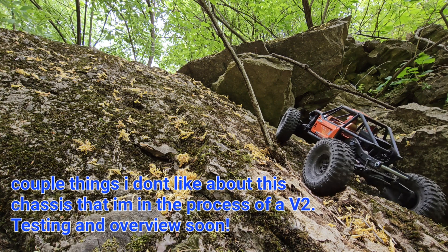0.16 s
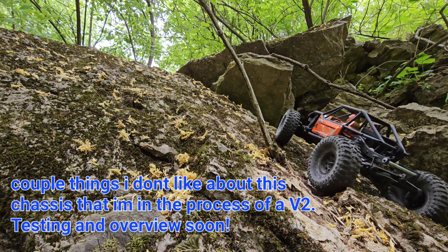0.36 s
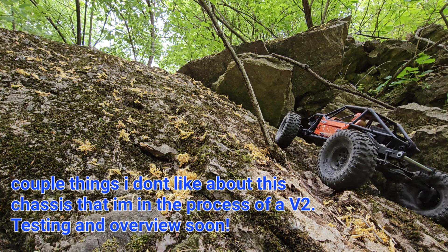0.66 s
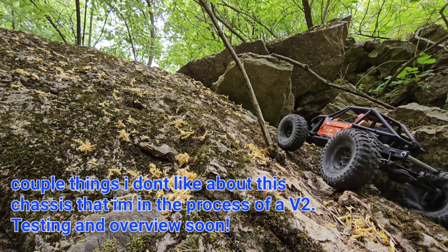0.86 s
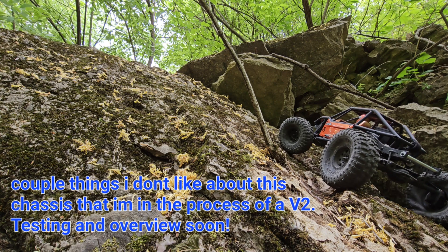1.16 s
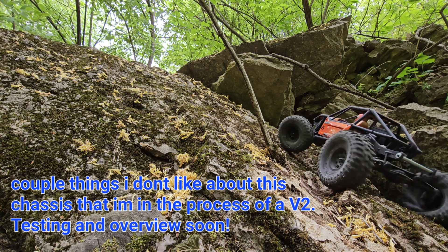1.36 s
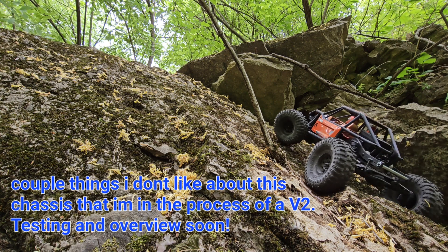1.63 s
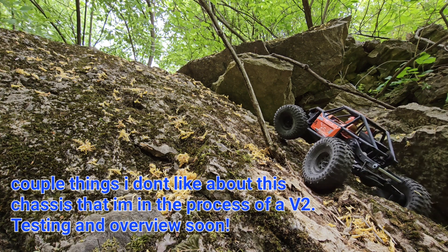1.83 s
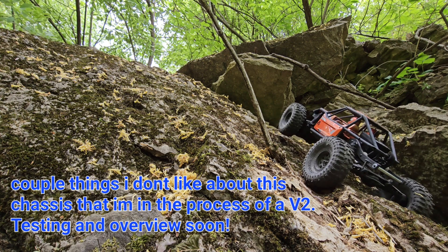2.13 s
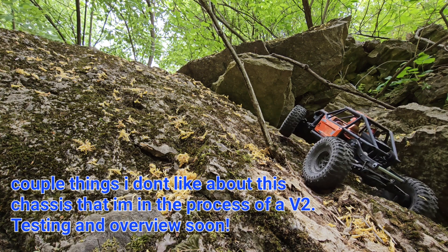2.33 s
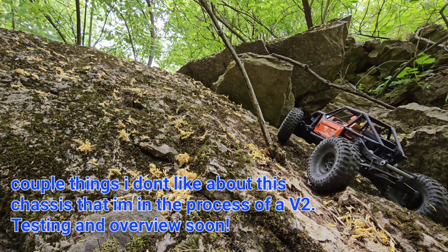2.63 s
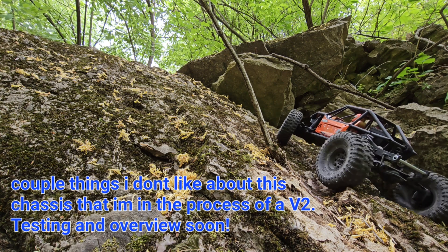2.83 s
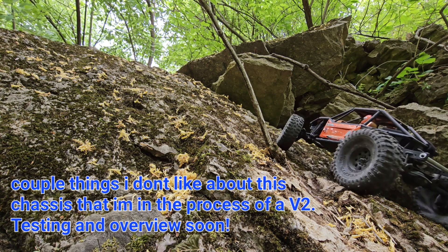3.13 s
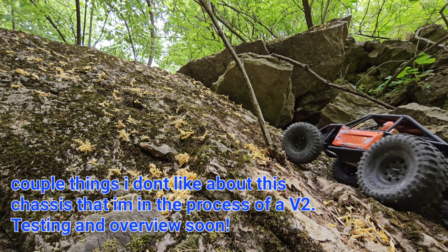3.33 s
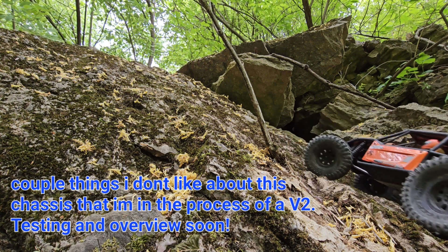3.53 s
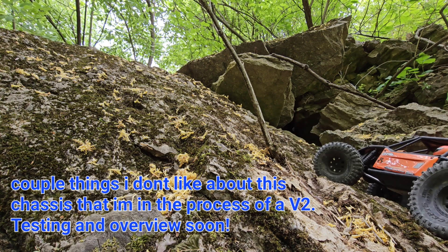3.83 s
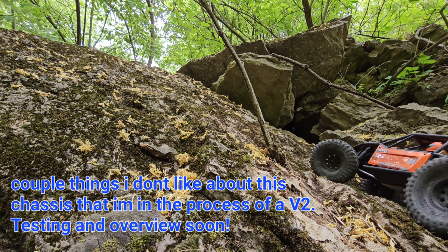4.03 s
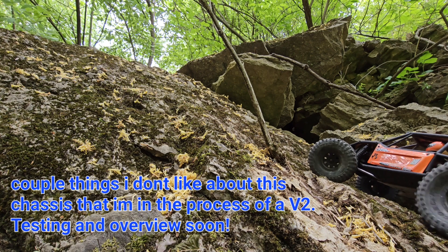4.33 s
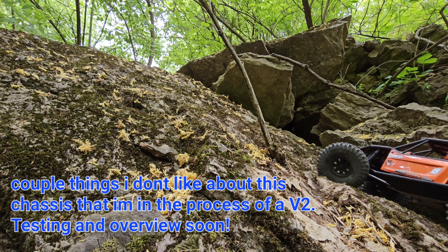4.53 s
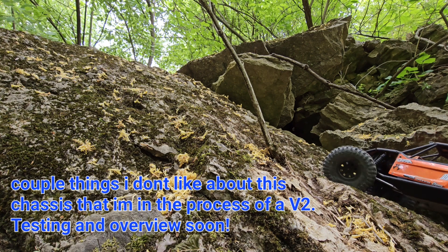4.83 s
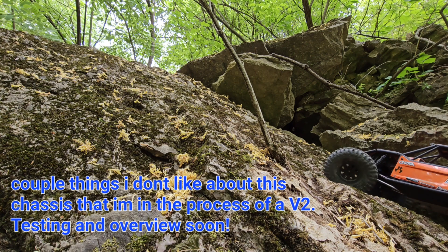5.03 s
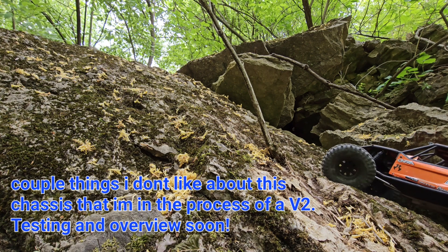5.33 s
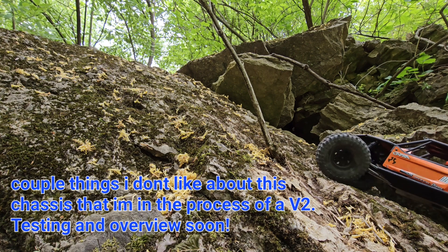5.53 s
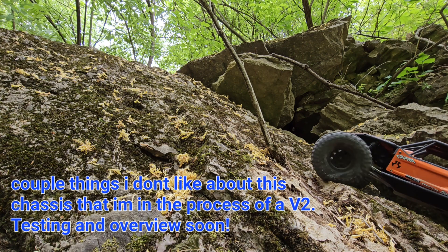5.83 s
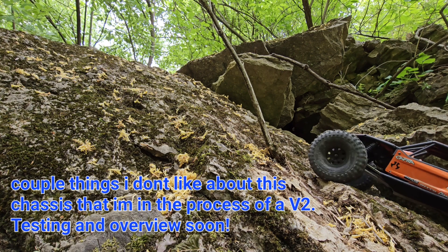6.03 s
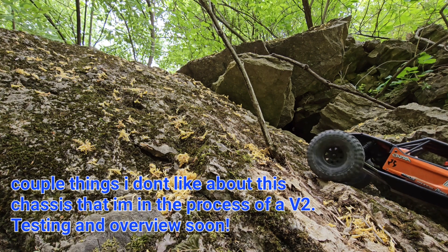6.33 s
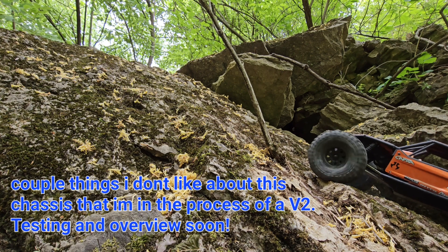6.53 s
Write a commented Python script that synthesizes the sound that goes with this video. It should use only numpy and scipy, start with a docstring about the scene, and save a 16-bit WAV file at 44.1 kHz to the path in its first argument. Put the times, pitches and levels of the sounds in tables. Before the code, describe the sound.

A small radio-controlled truck scrabbles up a rock slope, servo whining briefly, rubber tyres scraping and thumping, dry leaves crackling, growing close and loud.

```python
"""On a rock slope in the woods, a small radio-controlled truck crawls up and comes close.
Its rubber lugs slip and thump, made from random tiny impulses; grit and dry leaves crunch and snap as noise.
Knocks ring a few damped chassis tones, and the steering servo whines in short moves as its gear teeth mesh.
Behind it lie filtered noise for the hush of the trees and a low rumble, and a drifting tone for a far engine."""
import sys
import numpy as np
from scipy import signal
from scipy.fft import rfft, irfft
from scipy.io import wavfile
from scipy.ndimage import map_coordinates

SR = 44100
rng = np.random.default_rng(int(sys.argv[2]) if len(sys.argv) > 2 else 0)


def int16_out(signal):
    """Quantize to a 16-bit WAV file."""
    q = np.round(np.clip(np.atleast_2d(signal).T, -1, 1) * 32767)
    wavfile.write(sys.argv[1], SR, q.astype(np.int16))


N = 294058
T = np.arange(N) / SR  # time in seconds


def amp(db):
    """Turn decibels into a plain multiplier."""
    return 10 ** (np.asarray(db) / 20)


def unit(x):
    """Scale a sound to an average (RMS) level of one."""
    return x / np.sqrt(np.mean(x ** 2) + 1e-20)


def curves(rows):
    """The columns of a table of (seconds, values), joined by straight lines."""
    seconds, *columns = np.transpose(rows)
    return [np.interp(T, seconds, column) for column in columns]


def colour(x, points):
    """Filter with the given spectrum, never sounding before its input (minimum phase)."""
    hz, db = np.transpose(points)
    bins_hz = abs(np.fft.fftfreq(8192, 1 / SR))
    bins_db = np.interp(np.log(bins_hz + 1), np.log(hz), db)
    log_gain = np.log(amp(bins_db))
    taps = np.fft.ifft(np.exp(np.conj(signal.hilbert(log_gain)))).real[:4096]
    return signal.oaconvolve(x, taps)[:len(x)]


def drift(hz):
    """Slow random wander of unit size, mostly below the given rate."""
    f = np.fft.rfftfreq(N, 1 / SR)
    return unit(irfft(rfft(rng.standard_normal(N)) / (1 + (f / hz) ** 4), N))


def steady(x, seconds):
    """Even out the level over the given time, leaving faster flutter alone."""
    window = signal.windows.hann(int(seconds * SR))
    power = abs(signal.oaconvolve(x ** 2, window / window.sum(), "same"))
    return x / np.sqrt(power + 1e-12)


def add(mix, start, sound):
    """Lay a sound into the mix at a start time in seconds."""
    part = mix[max(round(start * SR), 0):][:len(sound)]
    part += sound[:len(part)]


def swell(start, length, attack_s, release_s):
    """Soft attack, hold and release."""
    attack = 0.5 + 0.5 * np.tanh(2 * (T - start) / attack_s - 1)
    return attack * np.exp(-np.maximum(T - start - length, 0) / release_s)


def air(points):
    """Steady noise of unit level with the given spectrum."""
    return unit(colour(rng.standard_normal(N), points))


def background():
    """Low rumble and a far engine, nearly alike in both ports, under the hush of the trees."""
    # Far engine. Each row: time in seconds, pitch in Hz, level in dB before a 1 dB lift
    engine = [(0, 91.7, -63), (.25, 91.4, -52), (.72, 94, -63), (2.0, 96.7, -61), (2.5, 99, -57),
              (3.15, 102, -54.5), (3.6, 102.7, -61), (4.3, 102.6, -75), (6.6, 102, -65)]
    # Spectra of the rumble and the trees. Each row: frequency in Hz, strength in dB
    rumble_colour = [(10, -17), (25, -3), (45, 0.5), (80, 1.5), (110, -8), (170, -22), (300, -29),
                     (800, -70.5)]
    woods_colour = [(20, -12), (120, 3), (220, 1.5), (350, -4.5), (650, -10.5), (1250, -12), (1800, -16),
                    (2800, -18.5), (5000, -18), (9000, -30), (12000, -41.5), (16000, -9.5)]
    # Level of the low rumble. Each row: time in seconds, level in dB
    rumble_level = [(0, -55.5), (.78, -56), (.9, -60.5), (2.0, -56.5), (3.3, -56.5), (4.1, -54), (5.6, -60),
                    (6.66, -55.5)]
    # The rumble surges briefly. Each row: start in seconds, length in seconds, level in dB
    surge_rows = [(2.207, 0.14, -50), (5.84, 0.098, -55)]
    surge_edge_s = 0.03

    engine_hz, engine_db = curves(engine)
    hum_gain = amp(engine_db + 1.0 + 0.54 * drift(hz=11.0))
    hum_turns = np.cumsum(engine_hz + 0.92 * drift(hz=7.5)) / SR
    hum = hum_gain * np.sin(2 * np.pi * hum_turns)

    surges = sum(amp(db) * swell(start, length, surge_edge_s, surge_edge_s)
                 for start, length, db in surge_rows)
    rumble_gain = np.hypot(amp(curves(rumble_level)[0]), surges)
    rumble = rumble_gain * steady(air(rumble_colour), seconds=0.39)
    shared = hum + rumble + amp(-72) * air(woods_colour)

    def port():
        """The shared sound plus a little rumble and hush of this port's own."""
        return shared + 0.21 * rumble_gain * air(rumble_colour) + amp(-70.5) * air(woods_colour)
    return np.array([port() for _ in range(2)])


def ring(hz, width_hz):
    """An unsteady resonance: a tone whose strength and phase wander."""
    cosine = drift(width_hz) * np.cos(2 * np.pi * hz * T)
    return cosine + drift(width_hz) * np.sin(2 * np.pi * hz * T)


def strain():
    """Unsteady resonances of the loaded gearbox and of the servo holding against a load."""
    # The drive labours and the servo holds. Each row: start in seconds, length in seconds,
    # gear whirr in dB, servo whistle in dB (both set before the 4 dB cut below)
    loads = [(0.094, 0.44, -76, -84.5), (0.754, 0.33, -96, -76), (1.108, 0.27, -88, -87),
             (1.435, 0.14, -61, -66), (2.67, 0.32, -74, -86), (3.096, .07, -82, -82)]
    attack_s, release_s = 0.037, 0.027
    gear_gain, hold_gain = sum(
        np.outer(amp([gear_db, hold_db]), swell(start, length, attack_s, release_s))
        for start, length, gear_db, hold_db in loads)
    gear = gear_gain * ring(hz=3000, width_hz=340)
    hold = hold_gain * ring(hz=7280, width_hz=300)
    return amp(-4.0) * (gear + hold)


def steering():
    """For each move, the mesh rate and gain: the motor spins up, sags under the load and brakes."""
    # Each row: start in seconds, powered time in seconds, free gear mesh rate in Hz, share of speed
    # lost to the load per second, level in dB, extra level of the odd multiples in dB
    moves = [(.799, 0.053, 2394, .3, -50.5, 4), (.906, .162, 2220, 2.5, -51.5, -1.5),
             (2.023, 0.086, 2542, 0.35, -49.5, -9), (2.118, 0.053, 2272, 0.32, -49, -4),
             (2.234, 0.11, 1220, 1, -58, -3), (2.336, 0.068, 1836, .6, -53, -5.5),
             (3.305, 0.063, 1197, 0.11, -54.5, -14), (3.348, 0.035, 1940, .1, -50.5, -3),
             (3.362, .096, 2275, 0.36, -45, -30), (5.9, 0.1, 3300, 3.5, -49, -15),
             (5.979, 0.064, 2710, 4, -46, 9)]
    spin_up_s, brake_s, release_s = 0.02, 0.048, 0.056
    speed_power = 1.55  # the whine grows as this power of the motor's speed
    ease_db_per_s = 29  # each move also fades from its start
    for start, length, free_hz, sag, db, odd_db in moves:
        t = np.arange(0, length + 0.1, 1 / SR)
        braking = np.maximum(t - length, 0)
        speed = (1 - np.exp(-t / spin_up_s)) * np.maximum(1 - sag * t, 0)
        speed *= np.exp(-(braking / brake_s) ** 2)
        gain = amp(db - ease_db_per_s * t) * speed ** speed_power * np.exp(-braking / release_s)
        yield start, free_hz * speed, gain, odd_db


def servo():
    """Gear teeth mesh at the motor's speed; uneven teeth add sidebands and a rasp."""
    # Tones of the whine. Each row: multiple of the mesh rate, level in dB
    mesh = [(1, 6), (2, -0.5), (3, 1.5), (4, -3), (5, -3.5), (6, -1.5)]
    # Colour of the servo's case. Each row: frequency in Hz, strength in dB
    case_colour = [(500, -16), (1800, -21.5), (3200, -8.5), (4700, -3), (6000, -11), (7300, -3), (9000, -7),
                   (10500, -17), (16000, -37)]
    out, wobble = np.zeros(N), 1 + 0.0059 * drift(hz=204)
    for start, hz, gain, odd_db in steering():
        turns = np.cumsum(hz * wobble[round(start * SR):][:len(hz)]) / SR
        whine = sum(amp(level + odd_db * (round(k) % 2)) * np.sin(2 * np.pi * round(k) * turns)
                    for k, level in mesh)
        shaft = turns / 9  # nine teeth on the pinion
        tooth_errors = sum(np.cos(2 * np.pi * (k * shaft + rng.random())) for k in range(1, 9))
        uneven = 1 + 0.52 * unit(tooth_errors)
        rasp = rng.standard_normal(len(hz)) * (1 + 0.67 * np.cos(2 * np.pi * turns))
        add(out, start, gain * (unit(whine) * uneven + 0.46 * rasp))
    return colour(out, case_colour)


def snaps():
    """Grit and leaf stems crack: noise crumbles up to a sharp break, then leaves a few crumbs."""
    # Each row: time in seconds, peak in dB before the 5 dB cut below
    snap_rows = [(0.1, -48.5), (0.249, -42), (0.444, -54), (0.4763, -45.5), (0.5052, -47.5), (0.5637, -42),
                 (0.576, -44.5), (1.257, -49), (1.4234, -46), (1.951, -49), (2.1413, -39.5),
                 (2.6449, -47.5), (2.9287, -44), (3.743, -37), (5.325, -35), (6.5485, -18)]
    # Spectrum of a snap. Each row: frequency in Hz, strength in dB
    snap_colour = [(300, -6), (1500, 15), (3000, 11), (5000, 4), (8000, 1.5), (10000, -6), (16000, -1)]
    out, t = np.zeros(N), np.arange(4096) / SR
    from_break = abs(t - 0.003)
    shape = np.exp(-from_break / 0.0011) + 0.1 * np.exp(-from_break / 0.004)
    for start, db in snap_rows:
        crack = colour(rng.standard_normal(len(t)) * shape, snap_colour)
        add(out, start - 0.0012, amp(db - 5.0) * crack / abs(crack).max())
    return out


def knocks():
    """A tyre lets go and knocks the chassis: damped modes ring under a short plastic clack."""
    # Each row: time in seconds, thump peak in dB before a 5.5 dB cut,
    # hardness as clack over thump in dB before a 6 dB lift
    blows = [(1.477, -33.5, -11.5), (2.532, -45, -6), (2.742, -43, -21), (3.274, -31.5, -16),
             (3.511, -26, -22), (3.639, -45, -2), (3.704, -33, -11), (3.742, -35, -8), (3.824, -45.5, -0.5),
             (3.853, -37, -6), (4.101, -35, -9), (4.15, -34.5, -11), (4.456, -32, -11), (4.835, -32, -11),
             (4.86, -20, -18), (4.897, -20.5, -13.5), (4.974, -22.5, -14), (5.001, -25, -33),
             (5.164, -28, -15), (5.42, -19.5, -14.5), (5.56, -21, -14.5), (5.771, -20.5, -15),
             (5.875, -25, -7), (6.005, -25, -27), (6.082, -29.5, -8.5), (6.594, -31, 1), (6.605, -29, -16)]
    # Chassis tones. Each row: frequency in Hz, level in dB, time to fade by 60 dB in seconds
    modes = [(260, -10, 0.044), (353, -3, 0.022), (502, 2.5, 0.026), (630, 8, 0.008), (1130, 8, 0.0062)]
    # Spectrum of the clack. Each row: frequency in Hz, strength in dB
    clack_colour = [(200, -7.5), (700, 24.5), (1400, -6), (2200, -1), (3100, 0), (5000, -18), (8000, -34),
                    (16000, -42)]
    out, t = np.zeros(N), np.arange(4096) / SR
    cushion = 1 - np.exp(-t / 0.00029)  # the rubber softens the first instant
    for start, db, hard_db in blows:
        stiffness = 1 + 0.019 * rng.standard_normal()  # each blow is tuned slightly differently
        thump = cushion * sum(amp(level - 60 * t / t60) * np.sin(2 * np.pi * hz * stiffness * t)
                              for hz, level, t60 in modes)
        clack = colour(rng.standard_normal(len(t)) * t * np.exp(-t / 0.00065), clack_colour)
        blow = thump / abs(thump).max() + amp(hard_db + 6) * clack / abs(clack).max()
        add(out, start + 0.00197, amp(db - 5.5) * blow)
    return out


def slips(per_s, spread_db):
    """Random tiny impulses: most are small, a few large."""
    size = amp(spread_db * np.minimum(rng.exponential(1, N), 4))
    return size * rng.choice([-1, 1], N) * (rng.random(N) < per_s / SR)


def paths(impulses, t60):
    """Three rows: the impulses themselves, and the dense scatter that they leave at each port."""
    decay = float(amp(-120 / (t60 * SR)))  # energy kept per sample
    energy = signal.lfilter([1 - decay], [1, -decay], impulses ** 2)
    return np.array([impulses, *(np.sqrt(energy) * rng.standard_normal((2, N)))])


def tyre_gains():
    """Strength of thumping, scraping and crackle: rolling, slides and the hiss of steering moves add in power."""
    # The tyres roll, louder as the truck nears. Each row: time in seconds, scraping level in dB
    rolling_level = [(0, -75), (.45, -75.5), (.72, -78.5), (1.0, -73), (1.35, -83), (1.7, -73), (2.05, -76),
                     (2.9, -76), (3.25, -66.5), (3.55, -62), (3.8, -67.5), (4.0, -68.5), (4.2, -58.5),
                     (5.0, -59), (6.05, -62), (6.67, -48)]
    roll_thump_db, roll_crackle_db = -1.5, -11  # against the scraping of a rolling tyre
    # The tyres break loose and slide. Each row: start in seconds, length in seconds, scraping in dB,
    # lug thumping over that in dB, leaf crackle over that in dB, swell from start to end in dB
    slides = [(0.407, 0.074, -68.5, 1.5, -18, -1), (1.425, 0.094, -55, -3.5, -11, 1),
              (1.521, 0.07, -60.5, -1, -4, -7), (1.764, .19, -67.5, 0, -11, -3.5),
              (2.51, 0.16, -73, 1.5, -12, -1), (3.304, 0.049, -62.5, 8, -10, 1),
              (3.369, .11, -59.5, 7.5, -2, 3.5), (3.488, 0.18, -57, 6.5, -6.5, 0.5),
              (3.688, .06, -56.5, -2, -8.5, -6), (3.817, 0.036, -60.5, 4, -11, -9),
              (3.906, 0.037, -62, 3.5, -5, -10), (4.089, 0.07, -49.5, 0, -16, 2.5),
              (4.221, 0.11, -55.5, 1, -25, -9), (4.332, 0.438, -54, 3, -11.5, 0),
              (4.811, 0.066, -53.5, 8, -12, -10), (4.948, 0.083, -56, 8, -15, -9),
              (5.07, 0.4, -54, 2, -11.5, 6), (5.468, 0.206, -50.5, -1, -11.5, 3.5),
              (5.635, 0.062, -46.5, 4.5, -2, 4), (5.718, 0.268, -48.5, 0.5, -10.5, 4),
              (6.063, .21, -50.5, 1, -12.5, 9), (6.291, 0.094, -44, 0, -5, 4.5),
              (6.385, 0.087, -38.5, 2, -5, 0.5), (6.479, 0.13, -40, 2, -6, 2),
              (6.62, 0.042, -50.5, 4, -2, -3)]
    attack_s, release_s = 0.017, 0.02
    # During each steering move a hiss rises and falls with the servo: thumping, scraping and crackle, in dB
    # against the servo's gain
    steer_db = [-23, -31, -16]

    balance_db = np.array([[roll_thump_db], [0], [roll_crackle_db]])
    power = amp(curves(rolling_level)[0] + balance_db) ** 2
    for start, length, db, thump_db, crackle_db, swell_db in slides:
        progress = np.clip((T - start) / length, 0, 1) - 0.5
        gain = amp(db + swell_db * progress) * swell(start, length, attack_s, release_s)
        power += np.outer(amp([thump_db, 0, crackle_db]), gain) ** 2
    for start, _, gain, _ in steering():
        for row, db in zip(power, steer_db):
            add(row, start, (amp(db) * gain) ** 2)
    return np.sqrt(power)


def tyres():
    """Lugs catch and let go; each slip thumps the tyre, scrapes the rock and crushes leaves."""
    # Spectra of the three sounds. Each row: frequency in Hz, strength in dB
    lug_colour = [(30, -32.5), (90, -11), (160, -2), (250, 1), (400, -3.5), (520, 1), (650, 0.5),
                  (830, -5.5), (1500, -17.5), (3000, -71), (8000, -82)]
    scrape_colour = [(200, -42), (700, -8.5), (980, 2.5), (1250, 6), (1550, 3), (1850, -1), (2300, -3),
                     (3000, -8), (4000, -13.5), (5500, -21), (8000, -22.5), (16000, -34.5)]
    crackle_colour = [(500, -33), (2000, -58), (3500, -5), (5000, -4), (7500, -2.5), (9800, 1),
                      (11500, 1.5), (13000, -3.5), (16000, 6)]
    grip = drift(hz=41.4)  # stick and slip, shared by all three sounds
    lugs = slips(per_s=1100, spread_db=2.0) * amp(2.0 * grip)
    scrape = slips(per_s=6000, spread_db=3.0) * amp(0.73 * grip + 1.04 * drift(hz=220))
    crackle = slips(per_s=8300, spread_db=3.5) * amp(1.205 * grip + 2.0 * drift(hz=316))
    layers = zip([lugs, scrape, crackle], [lug_colour, scrape_colour, crackle_colour], tyre_gains())
    out = np.zeros((3, N))
    for impulses, spectrum, gain in layers:
        rows = paths(steady(impulses, seconds=0.15), t60=0.022)
        sound = np.array([colour(row, spectrum) for row in rows])
        out += unit(sound) * gain
    return out


def rocks(x, t60, count=4):
    """A short scatter from the rock faces; its paths keep changing as the truck moves."""
    t = np.arange(SR // 8) / SR
    shares = np.array([drift(hz=6) for _ in range(count)])
    out = np.zeros(N)
    for share in shares / np.linalg.norm(shares, axis=0):
        echoes = rng.standard_normal(len(t)) * (rng.random(len(t)) < 5000 / SR)  # sparse echoes
        taps = echoes * (t > 0.0006) * amp(-60 * t / t60)
        out += signal.oaconvolve(x * share, taps / np.linalg.norm(taps))[:N]
    return out


def scene():
    """The truck reaches the left port first; rough ground and flat rock faces scatter it into both."""
    # The right port hears the truck later. Each row: time in seconds, delay in samples
    lag = [(0, 11.8), (3.1, 12.5), (3.5, 16.2), (5.5, 17.3), (6.67, 14.5)]
    # Balance between the ports. Each row: time in seconds, left minus right in dB
    pan = [(0, -1.5), (2.5, -1.5), (3.6, 2), (5, 1), (6.5, 1.5)]
    # Colour of the rock reflections. Each row: frequency in Hz, strength in dB
    echo_colour = [(100, -16), (500, -9.5), (1300, -5.5), (2500, 2), (6000, 7.5), (16000, 5)]
    rolling, *ground_scatter = tyres()
    body = knocks() + snaps() + servo() + strain()
    truck = rolling + body
    late = map_coordinates(truck, [np.arange(N) - curves(lag)[0]], order=3)

    faces = np.sqrt(0.45)  # 45 % of the scatter's power weight goes to the rock faces
    ground = np.sqrt(1 - faces ** 2)
    scatter = [colour(ground * x + faces * rocks(truck, t60=0.039), echo_colour)
               for x in ground_scatter]
    pan_db = curves(pan)[0]
    balance = amp(np.array([pan_db, -pan_db]) / 2)
    return (np.array([truck, late]) + scatter) * balance + background()


def record(dry):
    """Each microphone port has its own colour; then the highest treble is cut off."""
    # Each row: frequency in Hz, strength in dB
    left_port = [(60, -0.5), (250, 2.5), (1300, 1.5), (4000, 5), (8000, 3), (10600, -1.5), (11200, 6),
                 (12900, 8.5), (13500, 3), (16000, -3)]
    right_port = [(60, 0), (250, 1.5), (1300, -1.5), (4000, 1.5), (8000, -0.5), (10500, -3), (12000, -2.5),
                  (16000, -11.5)]
    edge_hz = 15820
    heard = np.array([colour(dry[0], left_port), colour(dry[1], right_port)])
    low_pass = signal.firwin(511, edge_hz, window=("kaiser", 9), fs=SR)
    return signal.oaconvolve(heard, low_pass[None], "same")


dry = scene()
out = record(dry)
int16_out(out)
```